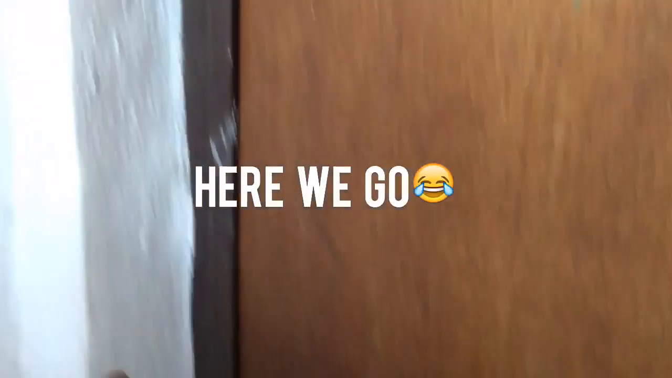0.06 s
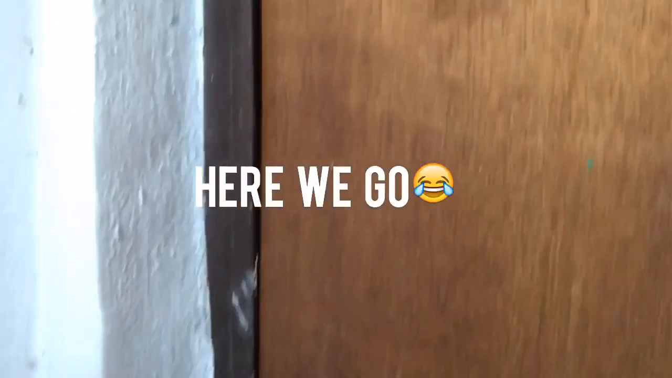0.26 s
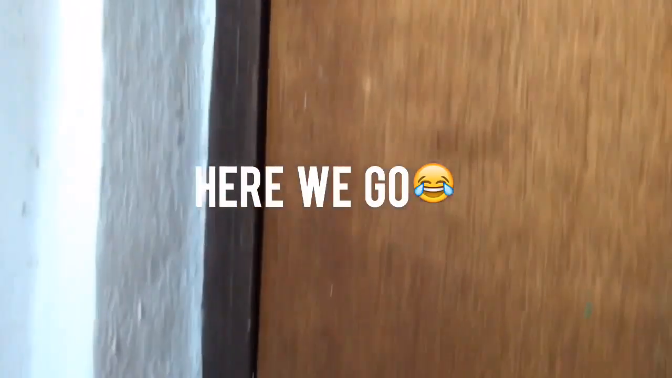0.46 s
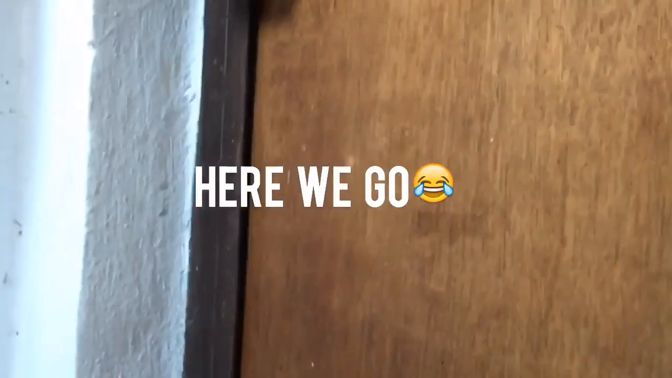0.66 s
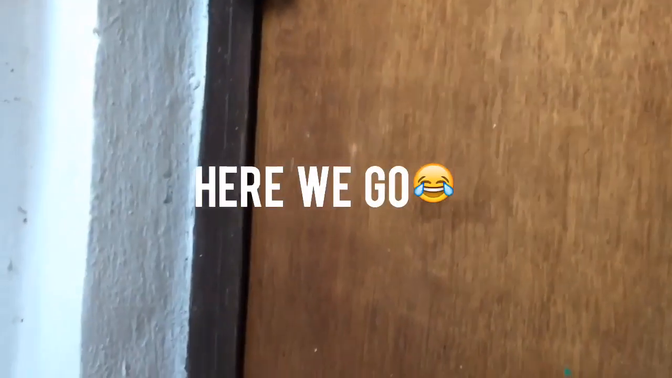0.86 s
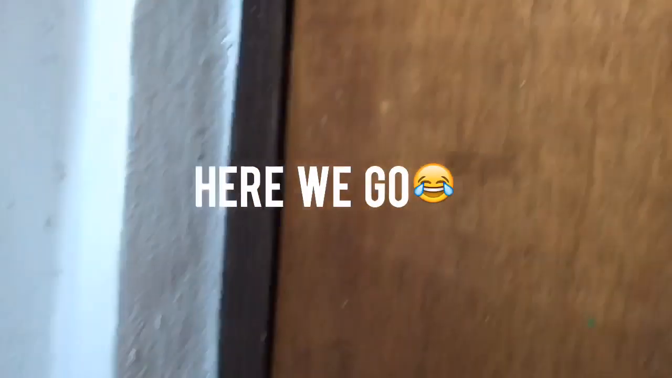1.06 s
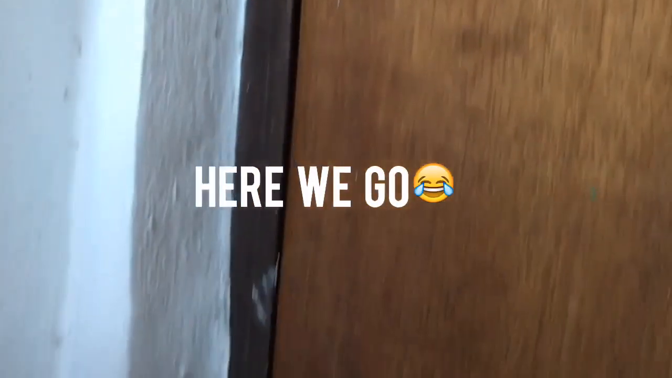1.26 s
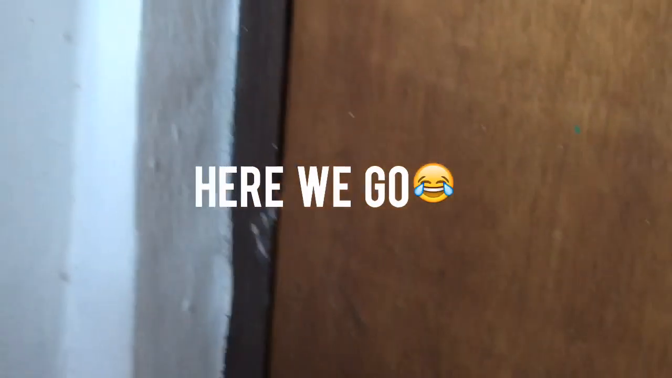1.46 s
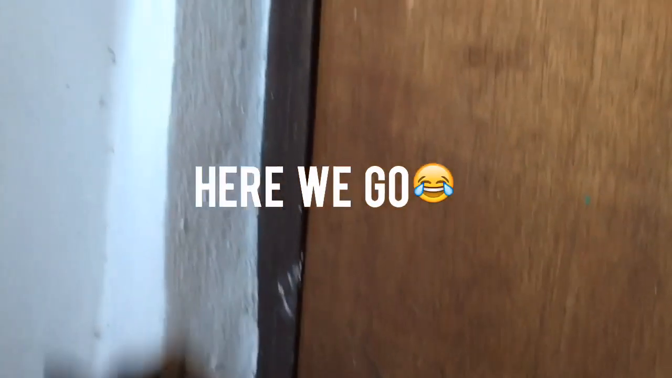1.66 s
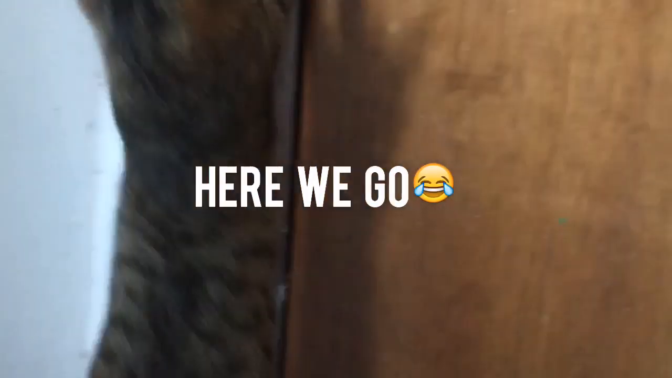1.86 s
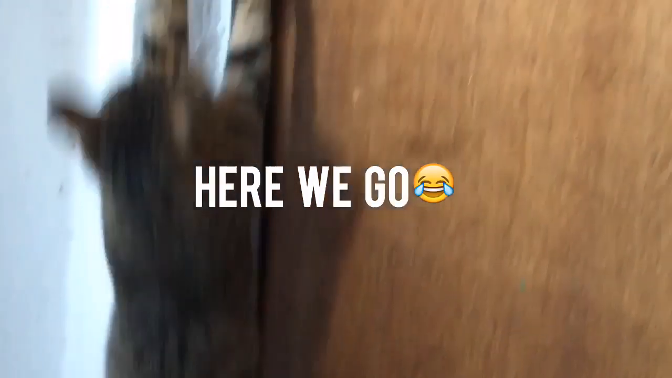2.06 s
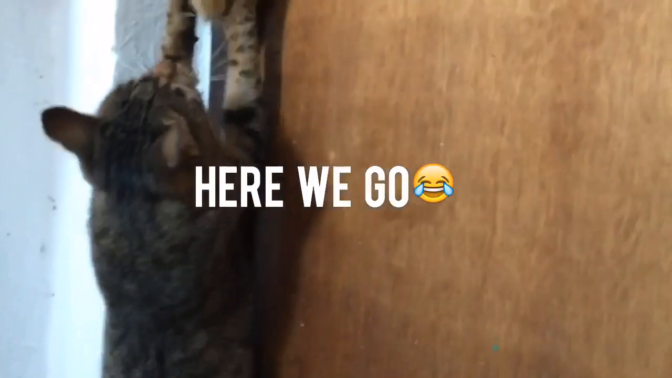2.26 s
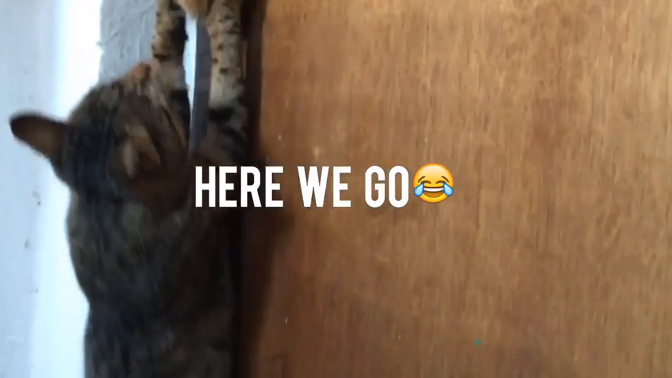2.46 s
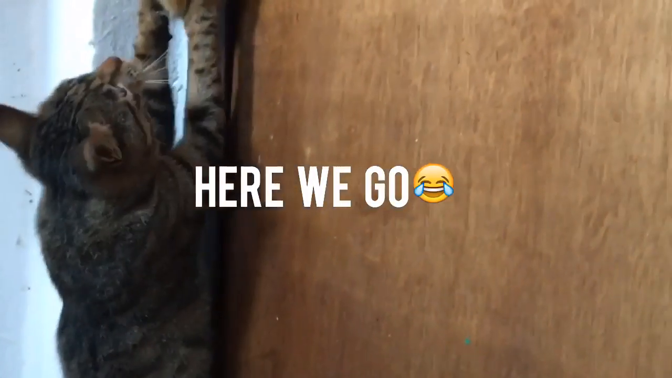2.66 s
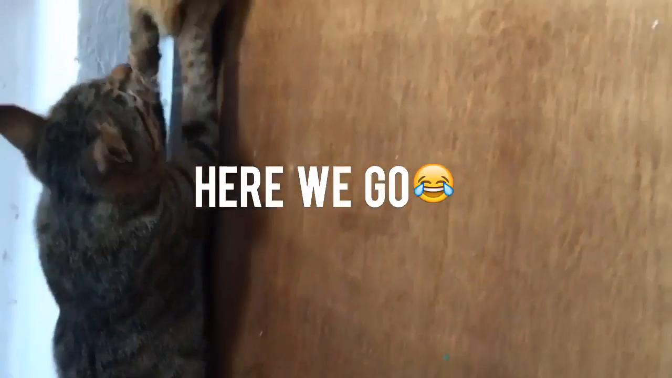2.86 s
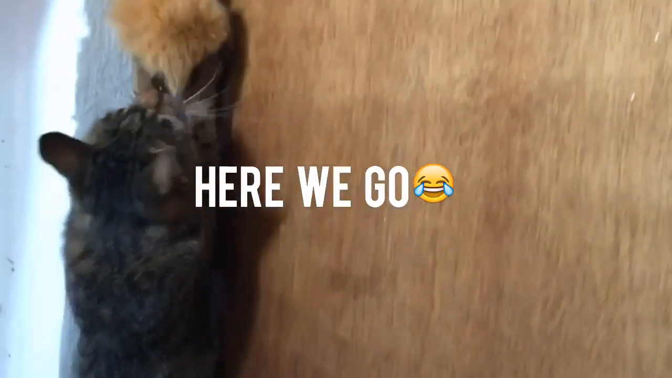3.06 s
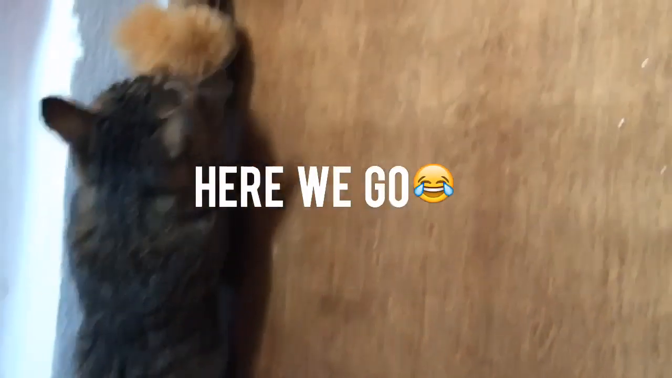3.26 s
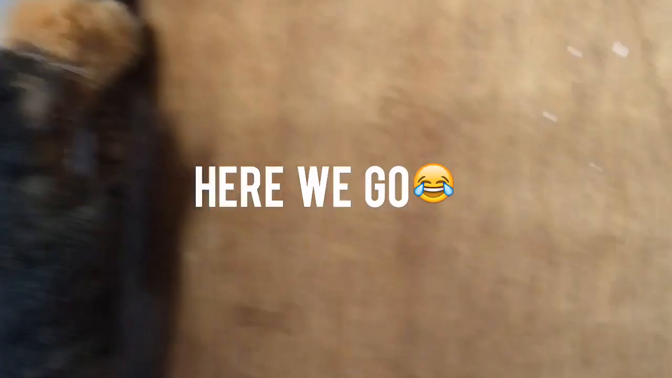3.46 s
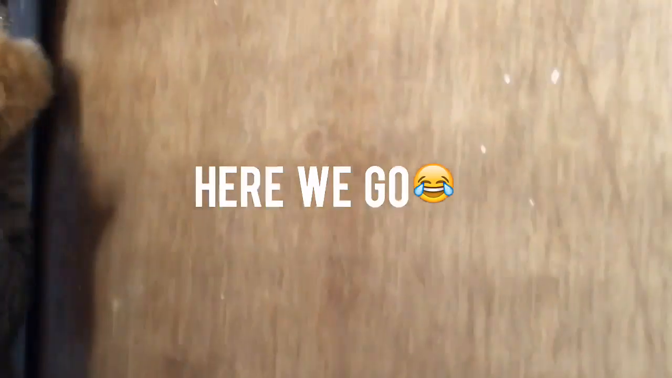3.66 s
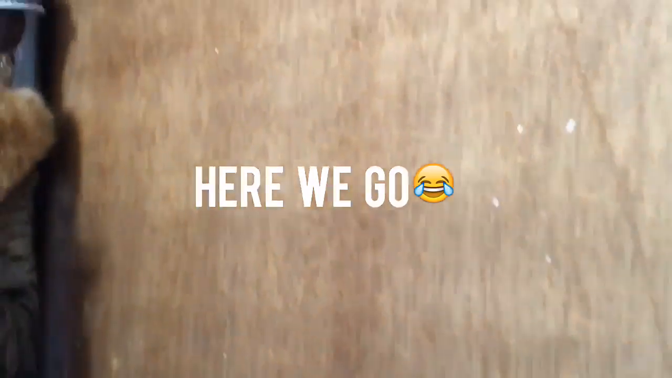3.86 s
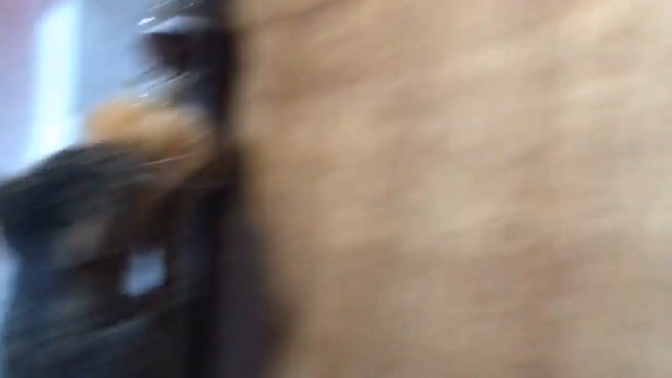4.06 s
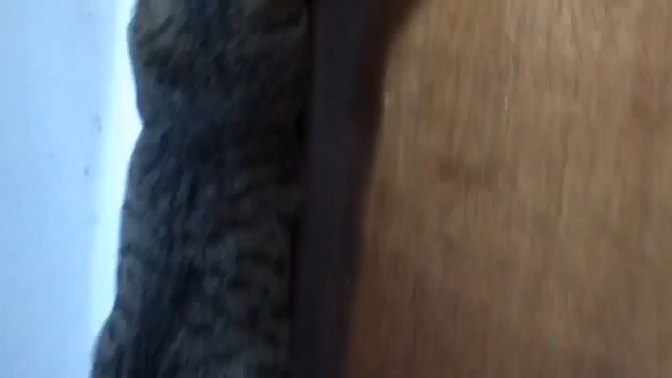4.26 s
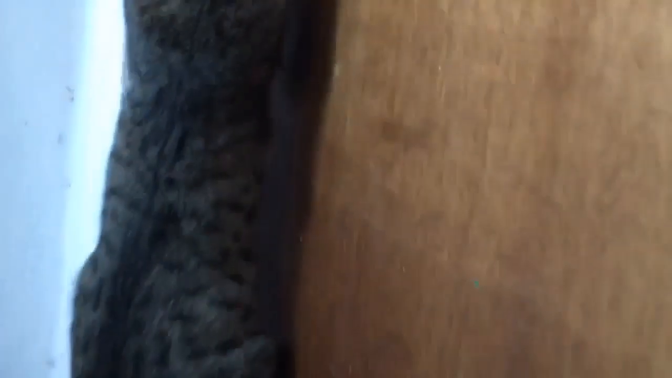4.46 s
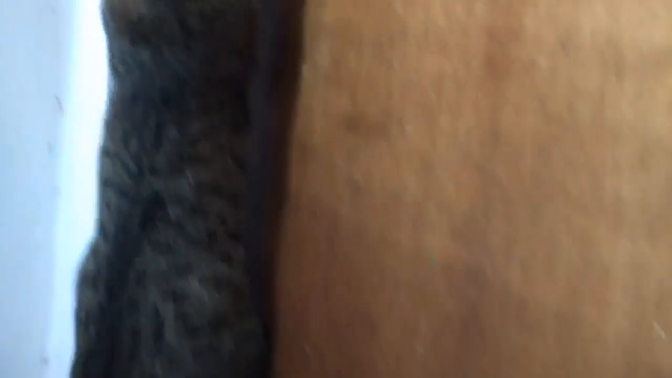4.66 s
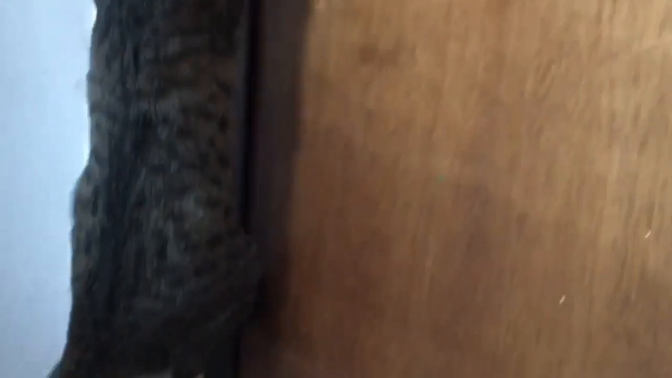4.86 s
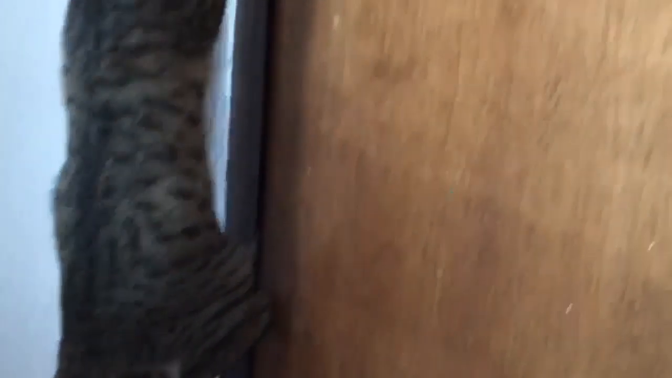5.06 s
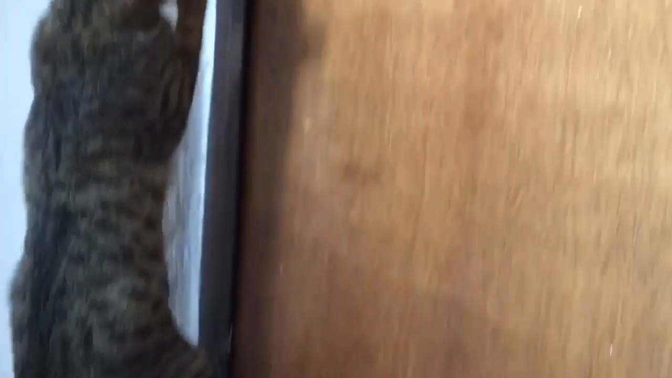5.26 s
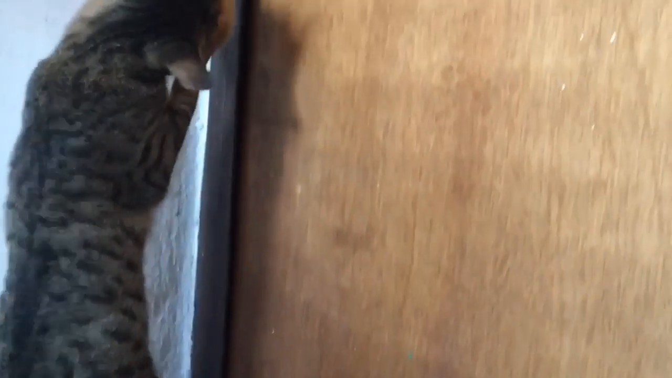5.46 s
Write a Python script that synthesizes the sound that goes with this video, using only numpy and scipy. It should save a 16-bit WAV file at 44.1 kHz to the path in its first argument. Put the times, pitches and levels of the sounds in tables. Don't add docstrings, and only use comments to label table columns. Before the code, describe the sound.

A small quiet room with low, soft air noise, captured close by a phone. A faint fur brush passes at 0.3 s. From 0.8 to 1.4 s a cat meows once: a closed hum opens to a brighter, nasal tone, then falls and fades with a breathy end. Quiet until about 2.2 s, when the cat leaps at the door: keys clink in quickening bursts, loudest near 2.4 s, with frame knocks, fur rubbing and a hollow body thud at 2.5 s. More keys jingle at 2.6 to 2.7 s over low panel booms. After a lull, soft heavy thumps land around 3.35 s, with a tiny metal tinkle near 3.6 s. At 3.9 to 4.2 s stronger blows combine with sharp claw scratches, ticks and twanging wood fibres. Sliding fur and scrapes follow at 4.4 to 4.8 s, a faint tinkle near 4.9 s, crisp claw snags at 5.1 s, then small fading scratches.

```python
import sys
import numpy as np
from scipy import signal
from scipy.fft import rfft, irfft, next_fast_len
from scipy.io import wavfile
from scipy.ndimage import map_coordinates

SR = 44100
rng = np.random.default_rng(int(sys.argv[2]) if len(sys.argv) > 2 else 0)


def dump(signal):
    limited = np.clip(np.atleast_2d(signal).T, -1, 1)
    pcm = np.round(limited * 32767).astype(np.int16)
    wavfile.write(sys.argv[1], SR, pcm)


def gain_from_db(level_db):
    decades = np.asarray(level_db, float) / 20
    return 10 ** decades


N = 242550
T = np.arange(N) / SR

# f/Hz, level/dB per Hz
ROOM_TONE = [(12, -55), (30, -11.5), (79, -2.5), (135, -16), (260, -20), (634, -29.5), (2060, -37.5),
             (15500, -48.5)]
# f/Hz, t60/s
ROOM_T60 = [(200, 0.53), (1000, 0.45), (4000, 0.35), (12000, 0.13)]
# f/Hz, half width/Hz, depth/dB
WALL_NOTCHES = [(491.5, 6, 13), (870, 5, 14), (931, 4.5, 15), (993, 5.5, 10), (1515, 9.1, 22)]
# start t/s, end t/s, level/dB, centre f/Hz,
# width/octaves
SWISHES = [(0.278, 0.41, -72.5, 2900, 1.3), (2.373, 2.396, -30, 15200, .05),
           (2.415, 2.437, -26, 14800, .05), (2.515, 2.548, -48, 15650, .05),
           (2.622, 2.64, -34, 11800, 0.51), (2.798, 3.034, -66, 3020, 1.5), (3.35, 3.433, -49.5, 495, 0.85),
           (3.196, 3.223, -61.5, 5370, 0.53), (3.653, 3.73, -69, 12530, .1), (4.18, 4.37, -70, 14000, .3),
           (3.925, 3.97, -61, 9000, .9), (3.54, 3.687, -63, 1200, 0.44), (4.042, 4.05, -32, 5770, 0.17),
           (4.153, 4.172, -50.5, 13000, 0.43), (4.38, 4.398, -46, 12100, 0.63),
           (4.52, 4.548, -47.5, 12400, 0.48), (4.776, 4.815, -58, 13000, 0.24),
           (5.005, 5.019, -58, 5500, 0.68), (5.065, 5.102, -46, 770, 0.39)]
# t/s, pitch f/Hz, effort/dB, tongue forward/0-1, mouth opening/0-1
MEOW = [
    (.79, 525, -65, 0.2, 0.3),
    (.824, 479.5, -57, 0.87, 0.1),
    (.89, 496.2, -49, 0.77, 0.4),
    (.975, 502.2, -52.5, 1, 0.59),
    (1.06, 512.6, -43.5, 0.36, 0.73),
    (1.16, 508, -45, 0.38, 0.75),
    (1.27, 478.4, -48.5, 0.26, 0.67),
    (1.33, 468.7, -55.5, 0.14, 0.84),
    (1.44, 433, -56, 0, 0.86),
]
# f/Hz, level/dB
THROAT = [(1200, -5), (1500, 4.5), (2550, -1), (3050, -4), (3550, 3), (4050, -7.5), (4600, -2.5),
          (5100, -16), (5700, 4), (6500, -15.5), (8200, -11.5), (9300, -22), (10500, -28), (13000, -24)]
# t/s, level/dB, hold/s
PUSHES = [(2.12, -54.5, 0.061), (2.268, -47.5, 0.026), (2.375, -47, 0.49), (2.643, -30.5, 0.038),
          (2.794, -31, 0.06), (2.891, -32, 0.14), (3.22, -45.5, .06), (3.275, -34.5, 0.026),
          (3.346, -35.5, 0.094), (3.5, -38.5, 0.075), (3.555, -37, 0.13), (3.79, -39.5, 0.1),
          (3.89, -27, 0.019), (3.943, -27.5, 0.036), (4.046, -39.5, 0.12), (4.209, -33, 0.058),
          (4.346, -33, 0.033), (4.435, -40, 0.11), (4.65, -29.5, .12), (4.834, -42, 0.13),
          (5.13, -52, 0.15), (5.314, -47.5, .02)]
# t/s, peak level/dB, knock/dB
BLOWS = [(2.267, -48, 11), (2.349, -42.5, 13), (2.386, -40.5, 12), (2.632, -34.5, 8), (2.652, -33, -7.5),
         (2.696, -52, -10), (2.819, -37, -21), (3.295, -40, -30), (3.34, -21, -22), (3.376, -23.5, -13.5),
         (3.399, -50, 12), (3.421, -29.5, -14), (3.459, -34.5, -14), (3.592, -37, -8), (3.8, -41.5, -15),
         (3.908, -24, -7), (3.944, -20.5, -17), (3.981, -30.5, -12), (4.059, -28.5, -14), (4.107, -39, -34),
         (4.169, -37, -43), (4.271, -34, -24), (4.508, -45.5, -5), (4.656, -35, -45), (4.8, -45, 3),
         (5.065, -50, 5), (5.111, -50, 9)]
# f/Hz, width/Hz, level/dB
PANEL_MODES = [(43, 17.2, -0.5), (94.2, 18.1, 0.5), (124.7, 22, -2.5), (182.7, 16, -7), (249, 29.7, -12.5),
               (360, 70, -17)]
# f/Hz, width/Hz, level/dB
FRAME_MODES = [(291, 3.9, -2), (324, 27, -13), (420.7, 28, -2.5), (503, 24, -4.5), (573, 58, -16),
               (712, 81, -2.5), (973, 85, -10)]
# t/s, peak level/dB, rough skin/dB
BODY_THUDS = [
    (2.4923, -26.5, 3.5),
    (2.498, -30.5, -4),
    (2.517, -25.5, -6),
    (2.55, -33.5, -16),
    (2.566, -36, -22),
    (2.58, -36, -13),
    (2.598, -33, -19),
]
# f/Hz, width/Hz, level/dB
HOLLOW_MODES = [(297, 17.5, 3), (438, 20, -6.5), (722, 20, -7), (876, 62, -3.5), (1100, 86, -3),
                (1290, 88, -4), (1780, 130, -9), (2200, 180, -14), (2720, 370, -18)]
# t/s, pressure level/dB, speed/0-1
SLIDE = [(2.15, -69.5, 0.68), (2.31, -48, 0.73), (2.4, -41, 0.44), (2.45, -50, 0.6), (2.51, -43.5, 0.4),
         (2.58, -47, 0.44), (2.76, -55.5, 0.52), (3.02, -74, 1), (3.1, -80, 1), (3.46, -68, 0.97),
         (3.6, -56, 0), (3.78, -68, 0.87), (4.03, -62, 0.76), (4.37, -48, 0.62), (4.55, -65.5, 0.83),
         (5.0, -68, 0.8), (5.19, -61, 1), (5.5, -82, 0.6)]
# f/Hz, level/dB per Hz
FUR_RUB = [(88, -41), (200, -25.5), (331, -7), (562, -4), (623, -8.5), (1320, -8), (5000, -37.5),
           (11000, -120)]
# f/Hz, level/dB per Hz
FUR_HISS = [(2000, -3), (4000, 0), (9000, -1), (16000, -3)]
# f/Hz, width/Hz, level/dB
WOOD_GRAIN = [(463, 50, -16), (665, 109, 4), (1100, 300, -5), (1326, 375, 5), (1855, 350, -0.5),
              (2214, 345, 7), (3545, 200, -4), (3980, 242, 3.5)]
# start t/s, end t/s, first level/dB, last level/dB, low rasp/dB
CLAW_STROKES = [(2.209, 2.213, -63, -72, 9.5), (2.273, 2.335, -44.5, -74, -3.5),
                (2.33, 2.447, -46.5, -42.5, -5), (2.485, 2.534, -49, -61, -8),
                (2.614, 2.657, -62, -51, 3.5), (3.189, 3.23, -63.5, -68, -10), (3.343, 3.35, -63, -61, 5),
                (3.379, 3.388, -54.5, -67.5, 6.5), (3.407, 3.43, -63, -57.5, 5),
                (3.797, 3.804, -61.5, -54, 8), (3.89, 3.92, -36.5, -38, 2.5), (3.964, 3.993, -62, -41.5, 3),
                (4.04, 4.089, -34, -37.5, 0), (4.095, 4.119, -45.5, -41.5, 0),
                (4.132, 4.196, -55, -57, -1.5), (4.329, 4.41, -71, -42.5, -1),
                (4.517, 4.558, -48, -67.5, -3.5), (4.745, 4.748, -64, -57, 4),
                (4.779, 4.82, -58.5, -56.5, 7), (5.0, 5.02, -74, -64.5, -7), (5.056, 5.116, -53.5, -49, 6),
                (5.122, 5.184, -48, -63, -4), (5.21, 5.252, -60, -56, -3.5), (5.294, 5.332, -66, -64.5, -3)]
# t/s, peak level/dB, fibre f/Hz
CLAW_TICKS = [(3.107, -57, 2530), (3.1628, -52.5, 6500), (3.3423, -43, 2000), (3.3755, -40, 2150),
              (3.421, -39.5, 2206), (3.7995, -44, 2300), (3.8961, -21, 2200), (3.9075, -41, 2520),
              (3.9197, -39, 3480), (3.9936, -24.5, 2460), (4.047, -17, 2060), (4.4, -33, 3960),
              (4.445, -42, 1760), (4.5093, -25.5, 4500), (4.74, -36, 1660), (4.793, -43, 2070),
              (4.835, -41, 1840), (4.819, -51, 2000), (4.952, -52.5, 5800), (5.063, -25, 3150),
              (5.07, -21, 2306), (5.107, -17, 2080), (5.128, -35, 2080), (5.333, -52, 1990)]
# t/s, peak level/dB, f/Hz
TWANGS = [(3.892, -28, 3380), (3.914, -36, 1950), (3.917, -36, 1100), (3.997, -29, 2420),
          (3.988, -27, 6900), (4.043, -33, 2080), (4.049, -25, 2580), (4.061, -26, 3960),
          (4.066, -33.5, 1010), (4.08, -40, 1034), (4.112, -28, 3980), (4.114, -32, 3300),
          (4.299, -42, 1168), (4.302, -40.5, 1355), (4.308, -45, 1860), (4.402, -50, 2000),
          (4.41, -34, 3870), (4.414, -42, 1780), (4.518, -53, 580), (5.065, -57, 854), (5.08, -45, 946),
          (5.107, -38, 3260), (5.11, -41.5, 922), (5.118, -43.5, 870), (5.128, -41, 2100),
          (5.205, -58.5, 1010), (5.225, -50, 944), (5.357, -59, 2160)]
# f/Hz, level/dB per Hz
RASP = [(300, -19), (600, 3.5), (1200, 5.5), (2200, 4.5), (2800, 0.5), (3400, 4), (4500, -0.5), (7000, -18)]
# f/Hz, level/dB per Hz
SCRATCH = [(1760, -40), (3000, -8.5), (4080, -10), (4830, -7), (6670, -1.5), (7780, -5), (12300, -4.5),
           (16000, -7)]
# t/s, clink level/dB, struck key f/Hz, ring over the clink/dB
KEY_HITS = [(2.22, -33, 13500, -7.5), (2.238, -50.5, 9900, -0.5), (2.2554, -38.5, 9200, 2),
            (2.267, -35, 12500, 3.5), (2.2767, -23.5, 12600, 0), (2.2876, -24, 12200, 2),
            (2.297, -28.5, 9200, 4.5), (2.309, -33, 12400, 11.5), (2.327, -37.5, 9170, 6),
            (2.342, -26, 12465, 8.5), (2.348, -18, 12465, 9.5), (2.355, -28, 12465, 19.5),
            (2.361, -26, 12465, 20.5), (2.367, -20, 11900, 11), (2.3744, -16, 9170, 10.5),
            (2.382, -19.5, 12465, 11), (2.3917, -5, 11900, 0), (2.41, -8, 9700, 3),
            (2.414, -18, 11900, 13.5), (2.418, -19.5, 10830, 18), (2.422, -8.5, 12465, 2),
            (2.429, -21, 10830, 8), (2.4457, -19, 12080, 2), (2.46, -29.5, 12200, -1),
            (2.477, -20.5, 10830, -2.5), (2.5156, -33, 9700, 9), (2.522, -23.5, 12600, -3),
            (2.539, -25.5, 9170, 2.5), (2.6112, -32, 5800, 9), (2.6208, -11, 13600, 6.5),
            (2.632, -14, 9860, 10), (2.641, -23, 12200, 3), (2.693, -29, 9300, -3.5),
            (2.7007, -19, 12600, -4), (2.7182, -18, 10830, 0), (3.5707, -54, 12800, -6),
            (3.578, -52, 11200, -4), (3.583, -48, 12800, -8), (3.592, -42, 12800, -11),
            (3.5975, -42, 9500, -8), (3.603, -34.5, 10800, -4.5), (3.637, -36, 12500, -2),
            (3.6565, -46.5, 6500, 6), (3.6458, -29.5, 13000, 2), (3.7133, -43.5, 12800, -3),
            (3.839, -51, 12800, -9), (4.857, -38, 12620, -2), (4.866, -46.5, 13200, -1.5),
            (4.917, -43.5, 7130, 2)]
# f/Hz, level/dB, t60/s
BUNCH_MODES = [(2300, -22, .05), (4880, -24, .2), (5800, -24, .05), (6850, -16, .1), (7800, -22, .05),
               (8700, -14, .07), (9170, -7, .09), (9700, -9, .05), (9860, -11, .05), (10830, -14, .22),
               (11290, -10, .08), (11460, -7, .1), (11880, -6, .08), (11980, -2, .1), (12200, -4, .08),
               (12465, 0, .1), (12600, -5, .08), (12850, -8, .05), (13670, -8, .05), (14920, -11, .05),
               (15500, -11, .05)]
# f/Hz, level/dB, t60/s
RING_MODES = [(6050, -11, .035), (6500, -11, .03), (7130, -8, .035), (9800, -11, .04), (10800, -2, .08),
              (11200, -5, .05), (12620, -6, .08), (13000, -5, .09), (13200, -5, .1), (13800, -8, .06),
              (15300, -15, .04)]
# f/Hz, level/dB per Hz
CLINK = [(1180, -38), (2200, -6.5), (4150, -35), (5100, -16), (8190, -10), (9490, -4), (12400, -9.5),
         (16000, -3)]


def along(points, hz):
    f, v = np.transpose(points)
    return np.interp(np.log(hz + 1), np.log(f + 1), v)


def curves(rows):
    s, *cols = np.transpose(rows)
    return [np.interp(T, s, c) for c in cols]


def during(rows, fade_s):
    return np.clip(np.minimum(T - rows[0][0], rows[-1][0] - T) / fade_s, 0, 1)


def wobble(rate_hz):
    return map_coordinates(rng.standard_normal(int(N * rate_hz / SR) + 4), [T * rate_hz])


def unit(x):
    return x / np.sqrt(np.mean(x ** 2) + 1e-20)


def filtered(x, response):
    m = next_fast_len(N + SR)
    return irfft(rfft(x, m) * response(np.fft.rfftfreq(m, 1 / SR)), m)[:N]


def resonances(modes):
    def response(f):
        total = 0
        for k, (c, width, db) in enumerate(modes):
            total = total + (-1) ** k * gain_from_db(db) * 1j * f * width / (c * c - f * f + 1j * f * width)
        return total
    return response


def grit(spectrum, spread_db, density):
    largest_slip = 2.8
    size_db = spread_db * np.minimum(rng.exponential(size=N), largest_slip)
    slips = rng.standard_normal(N) * (rng.random(N) < density) * gain_from_db(size_db)
    return unit(filtered(slips, lambda hz: gain_from_db(along(spectrum, hz))))


def chips(spectrum, per_second, cycles):
    count = int(per_second * N / SR)
    when, pitch, size = rng.random((3, count, 1))
    hz, n = 300 * 50 ** pitch, np.arange(400)
    decay = np.exp(-n * hz / SR / cycles)
    tone = np.sqrt(hz) * hz ** .5 * decay * np.sin(2 * np.pi * hz * n / SR) * gain_from_db(6 * size)
    grains = np.bincount(((when * N).astype(int) + n).ravel(), tone.ravel())[:N]
    return unit(filtered(grains, lambda f: gain_from_db(along(spectrum, f))))


def room_tone():
    return gain_from_db(-58.5 + wobble(4.3)) * grit(ROOM_TONE, 0, 0.94)


def swishes():
    out = np.zeros(N)
    for start, end, db, hz, width in SWISHES:
        band = [(hz * 2 ** (-3 * width), -40), (hz * 2 ** -width, -5), (hz, 0),
                (hz * 2 ** width, -5), (hz * 2 ** (3 * width), -40)]
        times = [start - .008, start, end, end + 0.0078]
        level_db = np.interp(T, times, [db - 32.5, db, db - 4.5, db - 32], -200, -200)
        out += gain_from_db(level_db) * grit(band, 0.57, 0.29)
    return out


def walls(hz, knots):
    comb_hz, comb_db = 71.7, 1
    ripple = map_coordinates(knots, [hz / comb_hz]) * (hz > 2200)
    return comb_db * ripple - sum(db / (1 + ((hz - c) / w) ** 2) for c, w, db in WALL_NOTCHES)


def meow():
    hz, jaw_db, forward, opening = curves(MEOW)
    tongue_db = jaw_db - 19 + 25 * forward
    throat_db = jaw_db - 17.5 + 13 * forward
    throat_scale = 0.74 + (1.147 - 0.74) * opening

    hum_ends_s, chest_joins_s, chest_rise_s, chest_dip_db = .81, 0.87, .08, 10
    silent = np.minimum((T - hum_ends_s) / 0.013, 1 - (T - chest_joins_s) / chest_rise_s)
    chest_db = -57 - chest_dip_db * np.clip(silent, 0, 1) + 0.34 * np.maximum(jaw_db + 47, 0)

    ending_s, ending_lasts_s, ending_drop, ending_waver = 1.395, 0.02, 0.03, .012
    ending = np.clip((T - ending_s) / ending_lasts_s, 0, 1)
    hz = hz * (1 - ending_drop * ending)
    waver = (0.002 + ending_waver * ending) * wobble(60.3)
    phase = 2 * np.pi * np.cumsum(hz * (1 + waver)) / SR

    knots = rng.standard_normal(1000)
    voice = gain_from_db(chest_db + walls(hz, knots)) * np.sin(phase)
    voice += gain_from_db(jaw_db + walls(2 * hz, knots)) * np.sin(2 * phase + 1)
    voice += gain_from_db(tongue_db) * np.sin(4 * phase + 2)
    for k in [3, *range(5, 31)]:
        effort_db = .5 * (throat_db + 52.5) * np.log2(k / 7)
        colour_db = along(THROAT, k * hz / throat_scale) + throat_db + effort_db - 8.0
        flicker_db = 3.6 * wobble(28.1) + 2.2 * wobble(130)
        voice += gain_from_db(colour_db + walls(k * hz, knots) + flicker_db) * np.sin(k * phase + k * k)

    husk = [(250, -28), (450, 1), (850, -4), (2400, -23), (3700, -10), (5000, -25), (7000, -17), (16000, -31)]
    breath = grit(husk, 0, 0.77) * (1 + np.cos(phase))
    glottis = np.zeros(N)
    glottis[round(.792 * SR)] = gain_from_db(-8.0)
    glottis[round(1.408 * SR)] = gain_from_db(-11)
    pop = filtered(glottis, resonances([(580, 49, 2.0), (1090, 620, -15.0), (2000, 180, -9.0)]))

    sung = np.sqrt(2) * gain_from_db(0.55 * wobble(34.46)) * voice + gain_from_db(jaw_db - 27.5) * breath
    sigh_s, sigh_rise_db_per_s, sigh_fall_db_per_s = 1.3, 484, 300
    sigh_db = -62.5 - np.maximum(sigh_rise_db_per_s * (sigh_s - T), sigh_fall_db_per_s * (T - sigh_s))
    return during(MEOW, 0.004) * sung + pop + gain_from_db(sigh_db) * breath


def pushed(start_s, level_db, hold_s):
    rise_db_per_s, sag_db_per_s, damp_db_per_s = 899.5, 35, 185
    t = T - start_s
    rise_db = rise_db_per_s * np.minimum(t - .02, 0)
    sag_db = sag_db_per_s * np.maximum(t, 0)
    damp_db = damp_db_per_s * np.maximum(t - .02 - hold_s, 0)
    return level_db + rise_db - sag_db - damp_db


def door():
    swing = np.sqrt(sum(gain_from_db(pushed(*row)) ** 2 for row in PUSHES))
    sway_hz = 71.1 * (1 + 0.012 * wobble(13))
    sway = np.sqrt(2) * swing * np.sin(2 * np.pi * np.cumsum(sway_hz) / SR)

    soft = swing * gain_from_db(7.5) * rng.standard_normal(N)
    hard = np.zeros(N)
    for s, db, knock_db in BLOWS:
        soft[round(s * SR)] += gain_from_db(db + 52.5)
        hard[round(s * SR)] = gain_from_db(db + knock_db + 37.0)

    thud = np.zeros(N)
    touch = np.sin(np.pi * np.arange(0, 1, 1 / (0.0014 * SR)))
    contact_s, n = 0.0081, N // 100
    for s, db, skin_db in BODY_THUDS:
        skin = gain_from_db(skin_db) * rng.standard_normal(n) * np.exp(-T[:n] / contact_s)
        push = skin + np.pad(touch, (0, n - len(touch)))
        thud[round(s * SR):][:n] += gain_from_db(db + 15.5) * push

    def padded_panel(f):
        pad = (1j * f / (25 + 1j * f)) ** 2 / (1 + 1j * f / 260) ** 2
        return pad * resonances(PANEL_MODES)(f)

    knocks = filtered(soft, padded_panel) + filtered(hard, resonances(FRAME_MODES))
    return sway + filtered(thud, resonances(HOLLOW_MODES)), knocks


def slide():
    pressure_db, speed = curves(SLIDE)
    level_db = pressure_db + 2.66 * wobble(40)
    rub = grit(FUR_RUB, 0.99, 0.27) + 0.72 * chips(FUR_RUB, 900, cycles=32)
    dull = gain_from_db(level_db) * unit(rub)
    dull = filtered(dull, lambda f: 0.86 + resonances(WOOD_GRAIN)(f))
    hiss = gain_from_db(level_db - 22.5 + 23.5 * speed) * grit(FUR_HISS, 1.1, 0.81)
    return during(SLIDE, 0.062) * (dull + hiss)


def claws():
    bright, dull = np.zeros(N), np.zeros(N)
    for start, end, first_db, last_db, low_db in CLAW_STROKES:
        times = [start - .006, start, end, end + 0.023]
        shape = gain_from_db(np.interp(T, times, [first_db - 23.0, first_db, last_db, last_db - 47.0], -200, -200))
        bright += shape ** 2
        dull += (shape * gain_from_db(low_db)) ** 2

    twang, t = np.zeros(N + SR), np.arange(SR // 20) / SR
    tick_t60_s, pluck_cycles = .045, 75
    for s, db, hz in CLAW_TICKS:
        low_db = min(-6, -47.5 - db)
        ring = gain_from_db(db + low_db - 5.5 - 60 * t / tick_t60_s) * np.sin(2 * np.pi * hz * t)
        twang[round(s * SR):][:len(t)] += ring
        away_s = np.abs(T - s)
        shape = gain_from_db(db - 9 - 60 * away_s / 0.025) + gain_from_db(db - 14 - 60 * away_s / 0.004)
        shape = (T > s - .0005) * shape
        bright += shape ** 2
        dull += (shape * gain_from_db(low_db)) ** 2
    for s, db, hz in TWANGS:
        pluck = gain_from_db(db - 60 * t * hz / pluck_cycles) * np.minimum(t / 0.0018, 1)
        twang[round(s * SR):][:len(t)] += pluck * np.sin(2 * np.pi * hz * t)

    scratch = grit(SCRATCH, 1.6, 0.56) + 0.3 * chips(SCRATCH, 2500, cycles=24)
    rasp = grit(RASP, 2.97, 0.28) + chips(RASP, 1200, cycles=26)
    rasp = filtered(rasp, lambda f: 0.56 + resonances(WOOD_GRAIN)(f))
    stutter = gain_from_db(0.6 * wobble(200) + 1.14 * wobble(70))
    return twang[:N] + stutter * (np.sqrt(bright) * unit(scratch) + np.sqrt(dull) * unit(rasp))


def keys():
    out, t = np.zeros(N + SR), np.arange(SR // 4) / SR
    held_from_s, ring_from_s, held_life, long_s = 2.5, 3, .25, .15
    clink = grit(CLINK, 1.3, 0.82)
    for (s, db, key_hz, ring_db), after in zip(KEY_HITS, [*KEY_HITS[1:], [9]]):
        modes = BUNCH_MODES if s < ring_from_s else RING_MODES
        hz, level_db, t60 = np.transpose(modes)[..., None]
        held = held_from_s < s < ring_from_s
        grip = held_life if held else 1
        draw = rng.standard_normal((3, len(hz), 1))
        struck_db = 12 / (1 + ((hz - key_hz) / 160) ** 2) + 4.0 * draw[0]
        struck_db = struck_db - 7 * (t60 > long_s) * held
        life_s = t60 * np.where(t60 > long_s, 1, grip) * np.clip((db + 63.0) / 40, .25, 1)
        tone = np.sin(2 * np.pi * hz * (1 + 0.00069 * draw[1]) * t + 9 * draw[2])
        ring = (gain_from_db(level_db + struck_db - 60 * t / life_s) * tone).sum(axis=0)
        choke = gain_from_db(-12 * np.clip((t + s - after[0]) / 0.0083, 0, 1)) * (1 - np.exp(-t / 0.00014))
        at = round(s * SR)
        crack = gain_from_db(-12.5 - 60 * t / 0.0036) + gain_from_db(-8.5 - 60 * t / 0.059)
        crack = crack * np.resize(clink[at:], len(t))
        out[at:][:len(t)] += gain_from_db(db - 10.0) * (gain_from_db(ring_db - 12.5) * ring * choke + crack)

    taps = np.zeros(N)
    for s, db, _, ring_db in KEY_HITS:
        taps[round(s * SR)] = gain_from_db(db - .3 * ring_db)
    snap = filtered(taps, resonances([(9300, 640, -1.5), (12800, 2900, -7.5)]))
    jiggle = gain_from_db(2.5 * wobble(250))
    return out[:N] * jiggle + gain_from_db(12.0) * snap


def room(x):
    hz, t, z = signal.stft(rng.standard_normal(SR // 2), SR, nperseg=256)
    decay = gain_from_db(-60 * t / along(ROOM_T60, hz)[:, None])
    tail = signal.istft(z * decay, SR, nperseg=256)[1]
    delayed = np.pad(x, (250, 0))
    return signal.fftconvolve(delayed, tail / np.linalg.norm(tail))[:N]


def scene():
    air = room_tone()
    cat = meow()
    sway, knocks = door()
    near = swishes() + claws() + keys()
    wet = gain_from_db(-8.5) * cat + gain_from_db(-8.5) * near + gain_from_db(-0.5) * knocks
    return (cat + near + knocks + sway + slide() + room(wet) + air)[None]


def low_pass(x):
    return signal.sosfilt(signal.butter(12, 16600, fs=SR, output="sos"), x)


def record(dry):
    top_hz = 15900
    edge = [top_hz - 200, top_hz + 200]
    mix = filtered(dry[0], lambda hz: gain_from_db(np.interp(hz, edge, [0, -34])))[None]
    return low_pass(mix)


dry = scene()
out = record(dry)
dump(out)
```